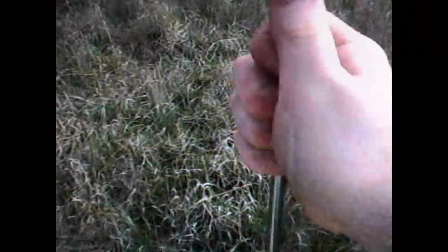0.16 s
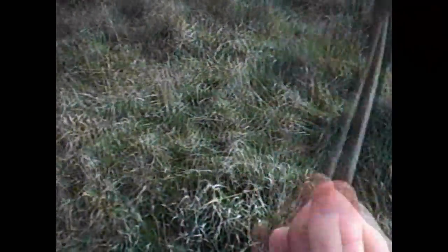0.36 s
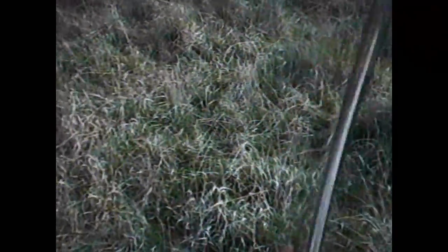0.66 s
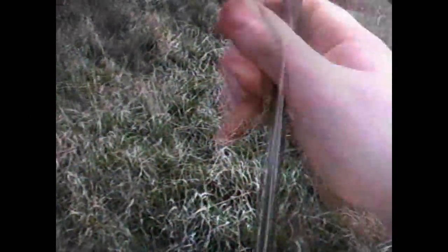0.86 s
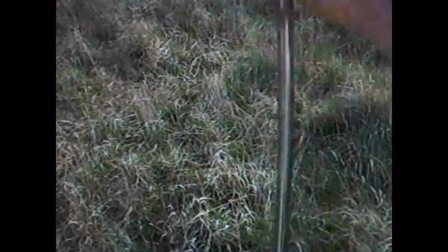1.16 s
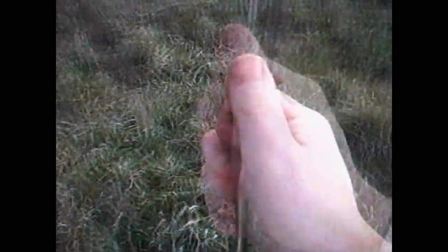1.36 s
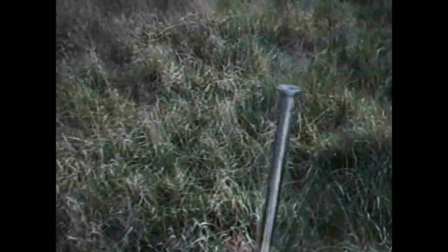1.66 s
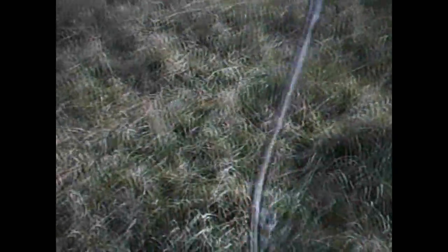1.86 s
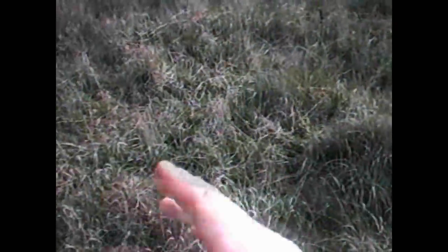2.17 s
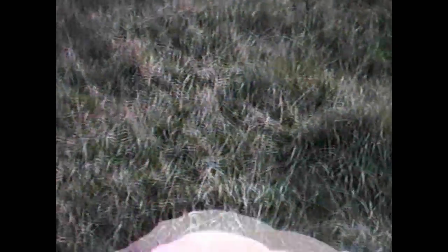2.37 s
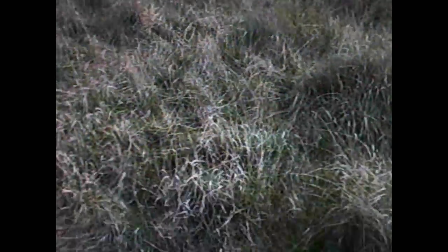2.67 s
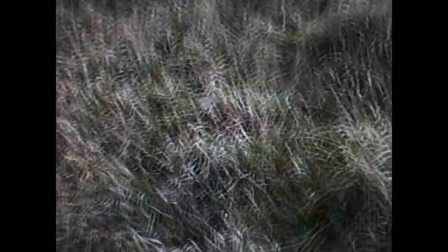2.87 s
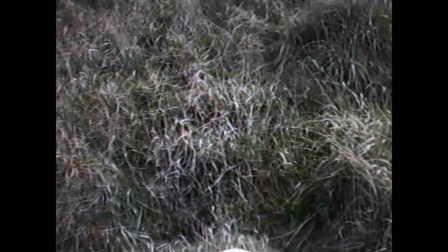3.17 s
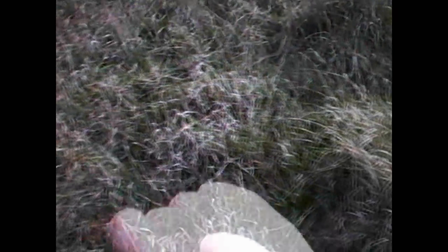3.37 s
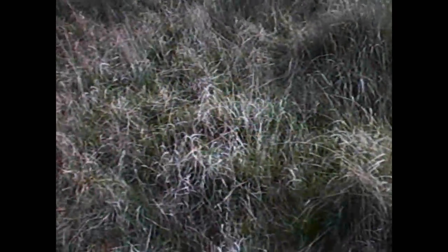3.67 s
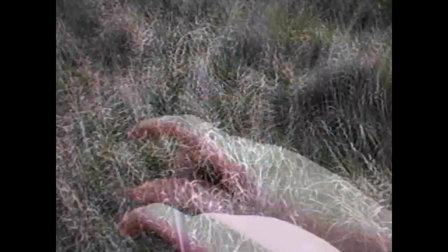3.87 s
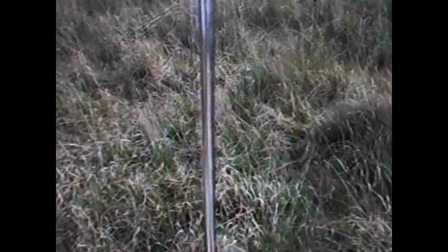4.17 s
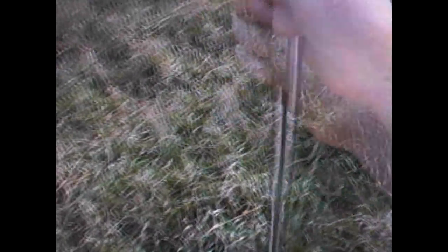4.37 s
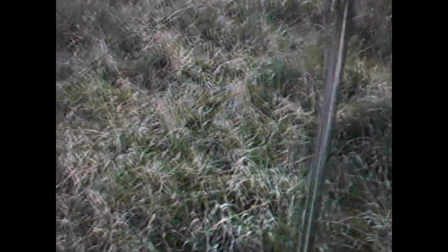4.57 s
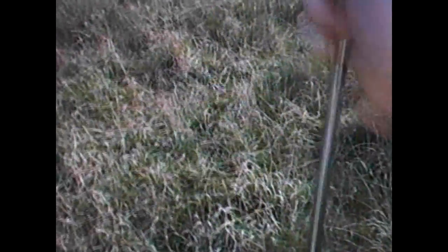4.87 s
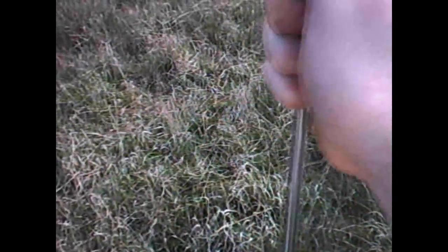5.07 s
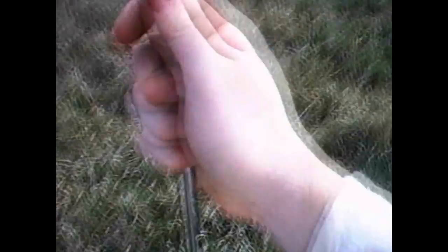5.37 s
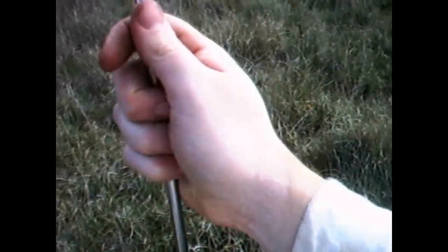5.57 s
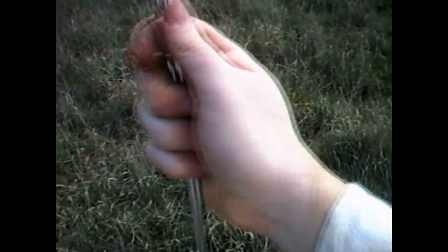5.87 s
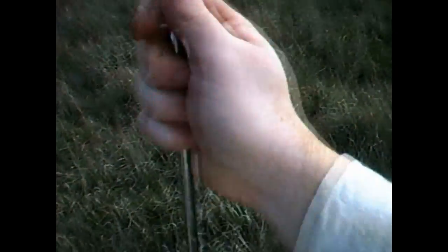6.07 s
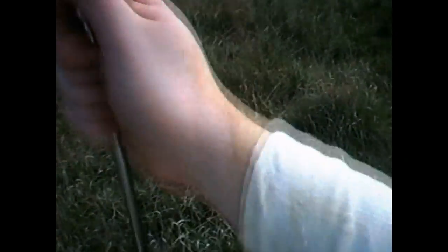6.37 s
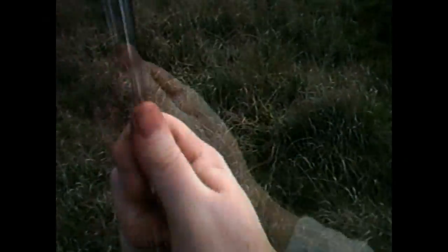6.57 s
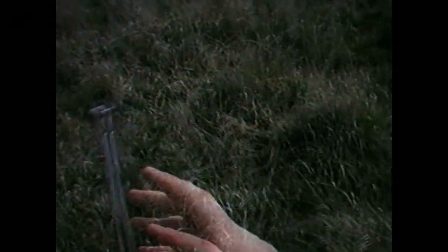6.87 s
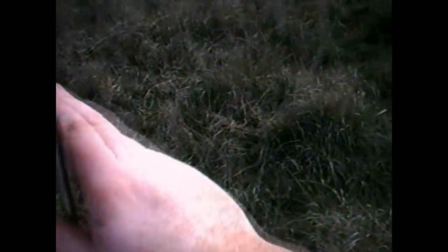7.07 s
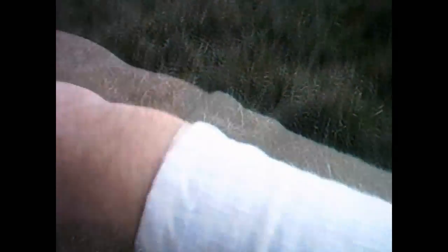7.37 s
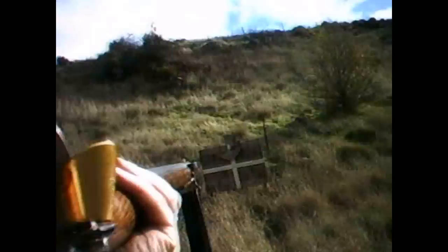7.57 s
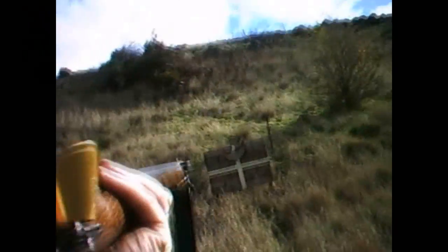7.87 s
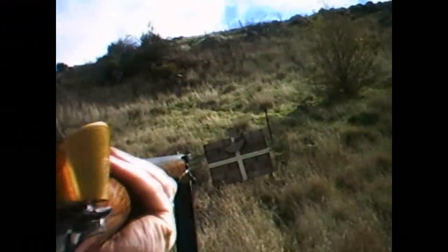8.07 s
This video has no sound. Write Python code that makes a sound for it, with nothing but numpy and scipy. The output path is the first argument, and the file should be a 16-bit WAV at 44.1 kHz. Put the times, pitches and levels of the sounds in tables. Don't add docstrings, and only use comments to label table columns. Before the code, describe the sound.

Soft outdoor hiss and low rumble run throughout, with a distant engine puttering unevenly about twenty-six times a second. From 0 to 0.9 s a steel rod is rammed in a gun barrel: crowded sharp clanks, scrapes and short bright rings, loudest near 0.4 s, with wooden thuds and small microphone jolts. A faint creak comes around 1.0 s, then another dense rattle from 1.2 to 2.2 s, with the hand rubbing wood. From 2.6 to 4.6 s come lighter scattered clinks, taps and brief singing rings, clustering near 4.4 s. From 5 to 7 s only sparse, faint ticks and soft scrapes remain. At about 7.6 s the scene cuts, the engine slightly louder; three hard, woody lock clicks fall at 7.78, 7.82 and 7.87 s, with a faint tick at 8.03. The close microphone is dull, gritty and slightly overloaded.

```python
import sys
import numpy as np
from scipy import signal
from scipy.fft import rfft, irfft, next_fast_len
from scipy.io import wavfile

SR = 44100
rng = np.random.default_rng(int(sys.argv[2]) if len(sys.argv) > 2 else 0)


def to_wav(s):
    ch = np.atleast_2d(s).T
    pcm = np.round(np.clip(ch, -1, 1) * 32767)
    wavfile.write(sys.argv[1], SR, pcm.astype(np.int16))


def linear_from_db(decibels):
    return 10 ** (np.asarray(decibels, float) / 20)


N = 362943


def at_hz(points, hz):
    point_hz, point_db = np.transpose(points)
    return np.interp(np.log(hz + 1), np.log(point_hz), point_db)


def coloured(x, spectrum):
    size = next_fast_len(N)
    gain = linear_from_db(at_hz(spectrum, np.fft.rfftfreq(size, 1 / SR)))
    y = irfft(rfft(x, size) * gain, size)[:N]
    return y / np.std(y)


def drift(rate_hz):
    r = np.exp(-2 * np.pi * rate_hz / SR)
    slow = signal.lfilter([1], [1, -2 * r, r * r], rng.standard_normal(N + SR))[SR:]
    return slow / np.std(slow)


def ring(clicks, hz, t60):
    r = linear_from_db(-60 / (t60 * SR))
    w = 2 * np.pi * hz / SR
    return signal.lfilter([0, np.sin(w)], [1, -2 * r * np.cos(w), r * r], clicks + 1e-18)


def add(out, s, piece):
    i = round(s * SR)
    out[i:i + len(piece)] += piece[:N - i]


def catches(per_s, lumpy_db):
    size_db = 3.7 * np.minimum(rng.exponential(1, N), 3)
    sizes = linear_from_db(size_db) * rng.choice([-1, 1], N)
    caught = rng.random(N) < per_s / SR
    return sizes * caught * linear_from_db(lumpy_db * drift(19.5))


def level(moves, rise_db_s, fall_db_s, rest_db):
    t = np.arange(0, N, 32) / SR
    db = rest_db
    for s, held, top_db in moves:
        before, after = np.maximum(s - t, 0), np.maximum(t - s - held, 0)
        db = np.maximum(db, top_db - rise_db_s * before - fall_db_s * after)
    return linear_from_db(np.interp(np.arange(N) / SR, t, db))


# pitch [Hz], level [dB per Hz].
AIR = [(15, -36.5), (25, -10), (43, -24), (126, -6), (288, -11), (501, -16), (1020, -20.5), (2350, -21.5),
       (3480, -28), (4500, -43.5)]
AIR_DB = -50.5


def air():
    gusts = linear_from_db(AIR_DB + 2.0 * drift(3.4))
    return gusts * coloured(rng.standard_normal(N), AIR)


# time [s], how far it is ahead of the steady rate [firings].
ENGINE_LEAD = [(0, -.33), (.9, -.58), (2.1, -.29), (2.7, .13), (3.3, -.07), (5.4, -.15), (6.0, .57),
               (6.9, .36), (7.8, .37), (8.3, .25)]
FIRINGS_PER_S, ENGINE_DB = 26, -33.5
NEARER_S, NEARER_DB = 7.6, 2


def engine(jitter_s, weak_share, weak_db):
    s, lead = np.transpose(ENGINE_LEAD)
    count = FIRINGS_PER_S * s + lead
    chance = rng.standard_normal((int(count[-1]) + 1, 2))
    weak = rng.random(len(chance)) < weak_share
    times = np.interp(np.arange(len(chance)), count, s) + jitter_s * chance[:, 0]
    firing_db = ENGINE_DB + NEARER_DB * (times > NEARER_S) + weak_db * weak + 2.2 * chance[:, 1]
    clicks = np.zeros(N)
    clicks[np.clip((times * SR).astype(int), 0, N - 1)] = linear_from_db(firing_db)

    t = np.arange(-SR // 50, SR // 50) / SR
    pulse = 0.69 * np.exp(-((t - .0003) / 0.0064) ** 2)
    pulse = pulse - 1.316 * np.exp(-(t / 0.0016) ** 2)
    return signal.fftconvolve(clicks, pulse - pulse.mean(), "same")


# start [s], time held [s], level [dB].
GRIPS = [
    (0, 0.022, -55),
    (.45, 0.56, -50),
    (1.35, 0.36, -47.5),
    (2.75, 0.13, -50),
    (3.7, 0.33, -54.5),
    (4.7, 0.25, -59.5),
    (7.33, .01, -58),
    (7.65, 0.012, -57),
]


def rustle():
    grains = catches(per_s=1800, lumpy_db=3.0)
    wood = ring(grains, 1138, 0.02) + ring(grains, 1370, 0.011) + 0.1 * ring(grains, 700, 0.00094)
    loudness = level(GRIPS, rise_db_s=53, fall_db_s=31.5, rest_db=-63.5)
    return loudness * wood / np.std(wood)


# start [s], level [dB], loudest ring [Hz], time held [s].
DRIVEN = [(0.0431, -20.5, 3076, 0.0084), (0.1406, -9.5, 3140, 0.0057), (0.4135, -2, 1090, 0.006),
          (0.4283, -7, 2300, .002), (0.7036, -9, 3125, 0.014), (0.8017, -21, 2460, 0.0088),
          (0.882, -33, 2230, 0.0058), (1.3771, -10.5, 3113, 0.01), (1.6284, -11.5, 3510, 0.0075),
          (1.688, -12, 2400, 0.009), (1.7865, -35, 3100, 0.013), (1.826, -25.5, 2490, 0.0029),
          (1.988, -13.5, 2433, 0.008), (2.627, -34.5, 2570, 0.003), (2.7337, -26, 1012, 0.0054),
          (2.906, -40, 3230, 0.0062), (2.9, -30, 1030, 0.0069), (3.336, -36, 3460, 0.005),
          (3.55, -22, 2420, 0.0063), (3.781, -42, 1044, 0.021), (3.872, -26.5, 2780, 0.001),
          (4.004, -44, 2330, 0.0065), (4.016, -42, 2330, 0.006), (4.057, -46, 2330, 0.0063),
          (4.187, -37, 2300, .003), (4.036, -42, 2280, 0.008), (4.1778, -35.5, 1950, .003),
          (4.301, -34.5, 1883, 0.01), (4.341, -25.5, 3060, 0.0083), (5.9221, -29, 3200, 0.00091),
          (6.297, -29.5, 1820, 0.0057), (6.921, -26.5, 3490, 0.0029)]
# start [s], level [dB], loudest ring [Hz], time held [s].
LEANED = [(.3412, -23, 3410, 0.0041), (.4297, -8.5, 3080, 0.0085), (.5683, -17, 3550, 0.0013),
          (.611, -30, 3200, .002), (.769, -35, 3060, 0.0079), (1.7665, -14, 3250, 0.004),
          (1.84, -28, 3140, 0.0026), (1.8516, -28.5, 2400, 0.0033), (1.9375, -21, 3220, 0.0082),
          (2.0638, -27, 2480, 0.002), (2.1422, -25.5, 2360, 0.0031), (2.2265, -32.5, 3280, 0.0057),
          (2.764, -39, 3290, .002), (2.9688, -34, 3480, 0.0025), (3.0545, -29, 3100, 0.0042),
          (3.1415, -27, 3270, 0.0012), (3.228, -55, 3180, 0.0017), (3.24, -20.5, 3070, 0.0011),
          (3.2505, -36, 3270, 0.013), (3.9164, -34.5, 3090, 0.0069), (4.076, -37, 3640, 0.022),
          (4.2456, -27, 3254, 0.013), (4.4052, -22.5, 3260, 0.002), (4.482, -32, 3060, 0.0048),
          (4.489, -23, 2980, 0.0066), (4.4005, -21, 3400, 0.003), (4.499, -36, 3030, 0.0036),
          (4.527, -34, 3050, 0.0065), (4.465, -34, 3000, 0.009), (4.6, -42.5, 3030, 0.012),
          (.6925, -19, 3190, 0.0043), (1.6172, -32, 3150, 0.0018), (4.5048, -27, 2970, 0.0032),
          (4.5353, -34, 3210, 0.02), (4.563, -35, 1810, 0.0098), (6.364, -39.5, 3100, 0.0027),
          (6.579, -33, 3380, 0.0058), (6.842, -39.5, 1800, 0.008), (6.856, -39.5, 1830, 0.0036),
          (6.58, -42, 1820, 0.03), (6.553, -39, 3460, 0.0035), (6.596, -34.5, 3420, 0.005),
          (6.572, -31, 3310, 0.0028), (6.8985, -35, 3630, 0.0017)]
# start [s], level [dB], loudest ring [Hz], time held [s].
MORE_TOUCHES = [(0.4109, -7, 1452, 0.0025), (.142, -18.5, 1697, 0.0088), (.05, -23, 3090, 0.0061),
                (.261, -50.5, 3360, .002), (1.3775, -18.5, 3108, 0.012), (1.96, -51, 3640, .02),
                (2.612, -46, 1760, .02), (2.7367, -27.5, 3290, 0.0064), (2.783, -39.5, 3190, 0.0026),
                (2.85, -46, 3400, 0.0053), (2.866, -49.5, 3640, 0.016), (3.075, -42, 3230, 0.0024),
                (3.115, -48, 1790, 0.017), (3.153, -43, 3240, .002), (3.165, -45, 3250, 0.0071),
                (3.2245, -49, 3060, .002), (3.252, -32.5, 3070, 0.0027), (3.44, -36, 3510, 0.018),
                (3.846, -33, 3400, .003), (3.94, -39, 1784, 0.012), (3.975, -38.5, 1760, 0.017),
                (4.44, -36, 1830, 0.011), (4.51, -31, 3120, .003), (4.545, -33, 3200, 0.0024),
                (6.3, -29.5, 3410, 0.0059), (6.93, -54, 3410, 0.023)]
# start [s], level [dB], loudest ring [Hz], time to fall 60 dB [s].
RAM_BOUNCES = [(.0155, -23.5, 3450, 0.059), (.1074, -17, 2760, 0.013), (.2728, -19, 3350, 0.025),
               (.2825, -17, 3460, 0.028), (.2995, -25.5, 3440, 0.059), (.3083, -36, 3240, 0.01),
               (.374, -26, 3000, 0.04), (.3858, -12.5, 3410, 0.025), (.4455, -22, 2400, 0.03),
               (.4898, -22.5, 3640, 0.046), (.6538, -19.5, 2350, 0.025), (.6625, -17, 3320, 0.037),
               (.6812, -21.5, 2250, 0.11), (.7365, -15.5, 2254, 0.027), (1.2975, -11.5, 3493, 0.042),
               (1.347, -26.5, 3400, 0.092), (1.614, -14, 3210, 0.026), (1.7052, -14.5, 2900, 0.029),
               (1.7245, -13.5, 3320, 0.03), (1.8107, -30, 3270, 0.092), (2.0178, -13, 2520, 0.023)]
# start [s], level [dB], loudest ring [Hz], 60 dB fall [s].
STOW_BOUNCES = [(2.5982, -42.5, 3140, 0.13), (2.6801, -18.5, 2405, 0.025), (3.113, -23, 3120, 0.017),
                (3.129, -23.5, 3320, 0.025), (3.271, -28.5, 3200, 0.015), (3.5985, -33, 2780, 0.046),
                (3.808, -39, 3060, 0.085), (3.8314, -20, 3210, 0.039), (3.938, -24, 3425, 0.061),
                (5.1165, -33, 3170, 0.04), (5.147, -46, 3220, 0.067), (5.175, -40, 3090, 0.05)]
# start [s], level [dB], loudest ring [Hz], time to fall 60 dB [s].
RAM_CLINKS = [(.0312, -20, 3060, 0.076), (.093, -23.5, 2860, 0.049), (.192, -15.5, 2320, 0.023),
              (.333, -22.5, 3110, 0.05), (.5516, -18.5, 3540, 0.06), (.859, -39, 3370, 0.081),
              (.9737, -20.5, 2230, 0.031), (1.2087, -23.5, 3030, 0.042), (1.2363, -17, 3150, 0.019),
              (1.279, -20.5, 3300, 0.065), (1.4126, -39.5, 1710, 0.16), (1.53, -39, 3540, 0.13),
              (1.731, -17, 2520, 0.044), (1.7775, -16.5, 3010, 0.014), (1.8063, -15, 3120, 0.028),
              (1.899, -33, 3220, 0.06), (1.911, -21.5, 3600, 0.05), (1.981, -32, 3130, .08),
              (2.029, -21, 2520, 0.035), (2.1563, -27, 1940, 0.026)]
# start [s], level [dB], loudest ring [Hz], 60 dB fall [s].
STOW_CLINKS = [(2.5657, -21.5, 3290, 0.019), (2.9579, -14, 3240, 0.016), (3.2016, -36.5, 3290, 0.02),
               (3.371, -26.5, 3270, 0.062), (3.4651, -22.5, 3110, 0.052), (3.4751, -24, 2550, 0.031),
               (3.5382, -23, 2940, 0.087), (3.6858, -28, 3640, 0.065), (4.2105, -25.5, 3080, 0.11),
               (4.236, -22, 3200, 0.062), (4.327, -27.5, 3060, 0.066), (4.385, -20.5, 3360, 0.037),
               (4.419, -19.5, 3080, 0.095), (4.4542, -32, 3380, 0.06), (5.52, -30.5, 2970, 0.02),
               (5.739, -30, 3640, 0.023), (6.5507, -36, 3510, 0.097), (6.638, -37, 3320, 0.06),
               (6.808, -44, 3300, 0.092), (6.962, -47, 3430, .03), (6.98, -42, 1800, 0.046),
               (6.712, -53, 3320, .05), (5.71, -39, 3050, 0.076), (6.265, -42.5, 3190, .04),
               (6.738, -42, 3140, 0.088), (6.756, -24.5, 2345, 0.028)]
# start [s], level [dB], pitch [Hz], time to fall 60 dB [s].
KNOCKS = [(.117, -21, 1100, 0.04), (.4002, -30, 1010, 0.1), (1.499, -36, 1060, 0.024),
          (1.649, -37, 1103, 0.16), (2.1722, -26.5, 1036, 0.039), (2.819, -31.5, 1010, 0.052),
          (2.9848, -32.5, 990, 0.062), (3.28, -31, 1053, 0.044), (3.4392, -27.5, 1060, 0.044),
          (3.6584, -34.5, 1000, 0.075), (3.9607, -41, 1003, 0.092), (4.0936, -26, 1006, 0.057)]
# start [s], level [dB], loudest ring [Hz].
TICKS = [(0.0168, -11, 3150), (0.0665, -34, 3020), (0.3093, -26.5, 3160), (0.6336, -39.5, 3110),
         (1.081, -47, 2980), (1.024, -42, 1810), (1.2129, -22.5, 3290), (1.3377, -34.5, 1780),
         (1.4126, -31, 1820), (1.5376, -31.5, 3110), (1.5566, -37, 1790), (1.7912, -21, 3000),
         (1.955, -28, 2330), (2.0594, -26.5, 2910), (2.1805, -31, 1890), (2.602, -33.5, 3210),
         (2.6225, -25.5, 1660), (2.6602, -43, 2430), (2.6716, -34, 1670), (2.9044, -29, 3390),
         (2.9198, -35.5, 1830), (2.9572, -37, 3300), (2.967, -28.5, 3240), (3.265, -27, 3210),
         (3.371, -32.5, 3120), (3.463, -25, 3080), (3.5378, -16.5, 3170), (3.897, -33, 3080),
         (3.9855, -28.5, 3630), (4.5216, -34, 3240), (6.618, -38, 3300)]
# start [s], level [dB], loudest ring [Hz].
MORE_TICKS = [(.0222, -17, 3180), (.1165, -26, 520), (.151, -19, 3150), (.2905, -28, 3450),
              (.3985, -25, 3400), (.526, -38, 1030), (.665, -25, 3950), (.8075, -27, 3950),
              (.8595, -33, 2300), (1.6185, -20, 3250), (1.6945, -19, 2900), (1.7235, -24, 1000),
              (1.8135, -24, 3150), (1.899, -29, 3650), (1.9935, -15, 3200), (2.255, -40, 3300),
              (2.281, -42, 3200), (2.5675, -31, 1720), (2.9735, -26, 3300), (3.8765, -29, 3000),
              (4.2215, -33, 1830), (4.2535, -31, 1810), (4.5015, -27, 3100), (5.1175, -34, 1650),
              (5.555, -43, 2950), (5.7395, -33, 3070), (6.9275, -32, 1800)]
# start [s], level [dB], pitch [Hz].
TAPS = [(0.2487, -38.5, 1030), (0.281, -28.5, 1040), (0.316, -38, 1030), (0.3319, -39.5, 734),
        (0.3735, -24.5, 1215), (0.6026, -36, 1010), (0.6524, -33, 690), (0.6627, -24, 590),
        (0.6892, -32, 600), (0.798, -33, 1290), (0.8055, -27, 707), (1.229, -35, 960), (1.3296, -37, 1010),
        (1.4463, -38, 1060), (1.4991, -28, 1060), (1.6272, -23.5, 1300), (1.647, -29.5, 1020),
        (1.6527, -25, 1020), (1.6873, -16, 1116), (1.7759, -34, 1207), (1.813, -35, 1510),
        (1.8205, -30, 1020), (1.9112, -36, 1100), (1.9372, -30, 1350), (3.108, -34.5, 1070),
        (3.567, -30, 1060), (3.7768, -29.5, 990), (3.841, -25, 1045), (3.958, -29, 1010),
        (4.024, -32.5, 1020)]
HARD_THUD_DB, LIGHT_THUD_DB, KNOCK_THUD_DB, TAP_THUD_DB = -5, -19, -1, -5
HELD_T60_S, TICK_T60_S, TAP_T60_S = 0.036, 0.028, 0.035
JAMMED_DB, JAMMED_T60_S = -14.2, .016
BOUNCE_S = 0.00071


def contacts():
    touches = []
    for rows, thud_db in [(DRIVEN, HARD_THUD_DB), (LEANED, LIGHT_THUD_DB)]:
        for s, db, hz, held in rows:
            t60 = JAMMED_T60_S if db > JAMMED_DB else HELD_T60_S
            touches.append((s, db, hz, thud_db, held, t60))
    loose = [(RAM_BOUNCES, HARD_THUD_DB), (STOW_BOUNCES, HARD_THUD_DB),
             (RAM_CLINKS, LIGHT_THUD_DB), (STOW_CLINKS, LIGHT_THUD_DB), (KNOCKS, KNOCK_THUD_DB)]
    for rows, thud_db in loose:
        touches += [(s, db, hz, thud_db, BOUNCE_S, t60) for s, db, hz, t60 in rows]
    touches += [(s, db, hz, LIGHT_THUD_DB, BOUNCE_S, TICK_T60_S) for s, db, hz in TICKS]
    touches += [(s, db, hz, TAP_THUD_DB, 2 * BOUNCE_S, TAP_T60_S) for s, db, hz in TAPS]
    touches += [(s, db, hz, LIGHT_THUD_DB, held, HELD_T60_S) for s, db, hz, held in MORE_TOUCHES]
    touches += [(s, db, hz, LIGHT_THUD_DB, BOUNCE_S, TICK_T60_S) for s, db, hz in MORE_TICKS]
    for k in range(6):
        touches.append((.9975 + .0087 * k, -41, 2300 - 110 * k, LIGHT_THUD_DB, BOUNCE_S, TICK_T60_S))
    return touches


# pitch [Hz], level [dB], time to fall 60 dB [s].
ROD = [(2523, -2.5, 0.36), (3060, 0, 0.64), (3640, 2, 0.97)]
# pitch [Hz], level [dB], time to fall 60 dB [s].
ROD_END = [(2330, -0.5, 0.12), (3410, 4, 0.9)]
# pitch [Hz], level [dB], time to fall 60 dB [s].
BARREL = [(1811, 3.5, 0.28), (2250, -15, .1), (1060, -7.5, 0.11)]
# pitch [multiple of loudest ring], level [dB].
OVERTONES = [(1.57, -8), (2.3, -26)]
# pitch [Hz], level [dB per Hz].
CRACK = [(180, -41), (300, -15.5), (776, -36.5), (1060, -18), (2030, 0), (2680, -3), (3120, 10), (4500, -5)]
LIGHT_BARREL_DB = -5.5


def hits(crack_db, others_db, spread_db, detune, knock_db):
    out = np.zeros(N)
    t = np.arange(SR // 5) / SR
    modes = np.array(ROD + ROD_END + BARREL)
    grit = coloured(rng.standard_normal(N), CRACK)
    wood_band = signal.butter(2, [180, 1500], "band", fs=SR, output="sos")
    wood = signal.sosfilt(wood_band, rng.standard_normal(N))
    chatter = drift(68)
    chance = rng.standard_normal((300, 3, len(modes)))

    def sine(hz):
        return np.sin(2 * np.pi * hz * t)

    for (s, db, hz, thud_db, held, t60), (strength, shift, phase) in zip(contacts(), chance):
        now = slice(round(s * SR), round(s * SR) + len(t))
        rise = 1 - np.exp(-t / 0.00057)
        shape = rise * linear_from_db(-60 * np.maximum(t - held, 0) / max(t60, .01))
        low = hz < 1500

        pitches = modes[:, 0] * (1 + detune * shift)
        barrel_db = LIGHT_BARREL_DB * (modes[:, 0] < 2000) * (thud_db == LIGHT_THUD_DB)
        gains = linear_from_db(modes[:, 1] + others_db + spread_db * strength + barrel_db)
        others = gains @ np.sin(2 * np.pi * np.outer(pitches, t) + 2 * phase[:, None])
        rough = np.exp(-held / .006 * (db > -17))
        overtones = sum(linear_from_db(g) * sine(k * hz) for k, g in OVERTONES)
        others = rough * others + (1 - rough) * overtones

        crack = rough * linear_from_db(crack_db) * grit[now] * (.5 + 1.5 * np.exp(-t / .003))
        steel = linear_from_db(knock_db * low) * (others + crack)
        thud = linear_from_db(thud_db + 9.5 - 5.6 * low) * wood[now] * (0.36 + np.exp(-t / 0.0028))
        hollow = sine(1.4 * hz) * np.exp(-t / 0.0071)
        hollow = hollow + 1.8 * sine(1.2 * hz) * np.exp(-t / 0.015)
        hollow = hollow + 0.46 * sine(2.3 * hz) * np.exp(-t / 0.007)
        tone = sine(hz) + 0.49 * low * hollow + steel + thud

        loose_db = np.clip((-10 - db) / 4, .5, 2) * np.minimum(t / .004, 1)
        add(out, s, linear_from_db(db - 4.0 + loose_db * chatter[now]) * shape * tone)
    return out


def jolts():
    out = np.zeros(N)
    t = np.arange(SR // 10) / SR / 0.0057
    swing = t * np.exp(-t) * np.sin(2 * t) * 5
    for s, db, hz, held in DRIVEN:
        add(out, s, linear_from_db(db - 33.5) * (hz > 1500) * swing)
    return out


# start [s], time held [s], level [dB].
STROKES = [(.1, 0.031, -43), (.4, 0.025, -32.5), (.6, 0.094, -42), (1.0, 0.032, -59), (1.24, 0.072, -47.5),
           (1.48, 0.088, -48.5), (1.64, 0.066, -36), (1.78, 0.055, -40.5), (2.0, 0.011, -37),
           (2.23, 0.073, -52.5), (2.57, 0.11, -50), (3.12, 0.045, -61), (3.27, .01, -59),
           (3.46, 0.0072, -37.5), (3.94, 0.093, -41.5), (4.19, 0.052, -43), (4.4, 0.15, -44.5),
           (4.68, 0.13, -56.5), (5.145, 0.038, -55), (5.3, .22, -58.5), (5.52, 0.094, -48.5),
           (5.63, 0.12, -50), (6.29, 0.012, -44.5), (6.56, 0.075, -48), (6.69, 0.1, -52),
           (6.91, 0.038, -45), (7.62, 0.095, -52.5)]
BORE_HZ, BORE_SHARE = 3380, 0.31


def slide():
    grains = catches(per_s=2400, lumpy_db=2.5)
    steel = sum(linear_from_db(db) * ring(grains, hz, min(.13 * t60, .03)) for hz, db, t60 in ROD + ROD_END + BARREL)
    high = signal.butter(2, 1800, "high", fs=SR, output="sos")
    hiss = signal.sosfilt(high, coloured(grains, CRACK))
    bore = ring(grains, BORE_HZ, 0.012)
    scrape = .7 * steel / np.std(steel) + .8 * hiss + BORE_SHARE * bore / np.std(bore)
    return level(STROKES, rise_db_s=356.5, fall_db_s=347, rest_db=-64) * scrape


# start [s], level [dB], pitch [Hz], length [s].
HUMS = [
    (4.3, -32, 2320, 0.017),
    (4.032, -34.5, 2300, 0.014),
    (4.054, -39, 2350, .013),
    (.4445, -22, 2300, .011),
    (3.112, -36.5, 1800, 0.032),
]


def hums():
    out = np.zeros(N)
    for s, db, hz, length in HUMS:
        t = np.arange(round(length * SR)) / SR
        swell = np.sin(np.pi * t / length)
        add(out, s, linear_from_db(db) * swell * np.sin(2 * np.pi * hz * t))
    return out


# start [s], level [dB], stopped after [s], short free end [0-1].
RINGS = [(3.29, -54, .04, 1), (3.38, -44, .06, 1), (3.49, -53, .045, 0), (3.945, -49, .1, 0),
         (3.945, -46, .1, 1), (4.078, -43, .098, 0), (4.255, -46, .045, 0), (4.345, -46, .04, 0),
         (4.57, -52, .12, 1), (5.74, -48, .02, 0), (6.995, -58, .07, 1), (6.93, -49, .045, 1),
         (1.213, -50, .025, 0), (1.243, -49, .036, 0), (1.958, -45, .026, 0), (1.672, -42, .017, 0)]
WAVER_HZ, WAVER_SHARE = 17, .35


def free_rings():
    out = np.zeros(N)
    for s, db, length, short in RINGS:
        t = np.arange(round(length * SR)) / SR
        to_stop = (length - t) / (1 + 8 * short)
        edge = np.minimum(1, np.minimum(t, to_stop) / 0.0088)
        for hz, mode_db, t60 in (ROD_END if short > .5 else ROD):
            fade = linear_from_db(db + mode_db - 60 * t / (2 * t60))
            waver = 1 + WAVER_SHARE * np.sin(2 * np.pi * WAVER_HZ * hz / 3000 * t + hz)
            add(out, s, fade * edge * waver * np.sin(2 * np.pi * hz * t + hz))
    return out


# start [s], peak level [dB].
LOCK = [
    (7.7808, -6),
    (7.8201, -7),
    (7.8717, -10),
    (8.032, -28.5),
]
# pitch [Hz], level [dB], time to fall 60 dB [s].
STOCK = [(1060, 2, 0.035), (1248, -4, 0.068), (1360, -10, 0.016), (2000, -7.5, 0.017), (500, -19, 0.038)]


def lock(held_s, damped_t60, soft_hz):
    out = np.zeros(N)
    t = np.arange(SR // 10) / SR
    body = sum(linear_from_db(db - 60 * t / t60) * np.sin(2 * np.pi * hz * t) for hz, db, t60 in STOCK)
    seated = .3 + .7 * linear_from_db(-60 * np.maximum(t - held_s, 0) / damped_t60)
    soft_edge = 1 - np.exp(-(t / 0.00033) ** 2)
    for s, db in LOCK:
        add(out, s, -linear_from_db(db - 10.0) * body * seated * soft_edge)
    return signal.sosfilt(signal.butter(2, soft_hz, fs=SR, output="sos"), out)


def scene():
    steel = hits(crack_db=-2.5, others_db=-10.0, spread_db=2.0, detune=0.033, knock_db=-13.0)
    steel = steel + free_rings() + hums() + slide()
    click = lock(held_s=.0072, damped_t60=.006, soft_hz=3000)
    thumps = engine(jitter_s=.0025, weak_share=0.17, weak_db=-11.5)
    return (steel + jolts() + rustle() + click + thumps + air())[None]


# pitch [Hz], level [dB].
MIRROR = [(3900, -20.5), (4020, -1.5), (4360, -6.5), (4950, -17.5), (5500, -27), (6200, -38.5),
          (7000, -53.5), (8000, -75.5), (11000, -61.5), (14000, -70)]
RECORDER_RATE_HZ = 8000


def mirror_image(x):
    folded = 2 * x * np.cos(2 * np.pi * RECORDER_RATE_HZ * np.arange(N) / SR)
    folded = folded * np.minimum(1, np.arange(N, 0, -1) / 200)
    size = next_fast_len(N + SR)
    leak = linear_from_db(at_hz(MIRROR, np.fft.rfftfreq(size, 1 / SR)))
    return irfft(rfft(folded, size) * leak, size)[:, :N]


def low_pass(x):
    return signal.sosfilt(signal.butter(12, 16400, fs=SR, output="sos"), x)


def record(dry):
    early = np.roll(dry, -29)
    x = .36 * np.tanh(early / .36)
    x = signal.sosfilt(signal.cheby1(10, .5, 3995, fs=SR, output="sos"), x)
    x = signal.sosfilt(signal.butter(4, 3750, fs=SR, output="sos"), x)
    x = signal.sosfilt(signal.butter(2, 42, "high", fs=SR, output="sos"), x)
    x = x + mirror_image(x)
    last_digit_hiss = linear_from_db(-98) * rng.standard_normal(N)
    stray_sample = linear_from_db(-27) * (np.arange(N) == round(.4325 * SR))
    mix = x + last_digit_hiss - stray_sample
    return low_pass(mix)


dry = scene()
out = record(dry)
to_wav(out)
```